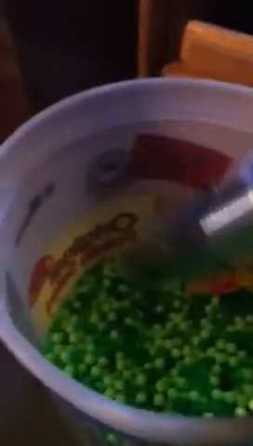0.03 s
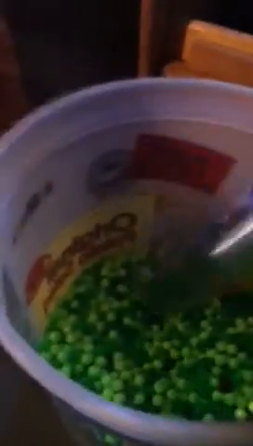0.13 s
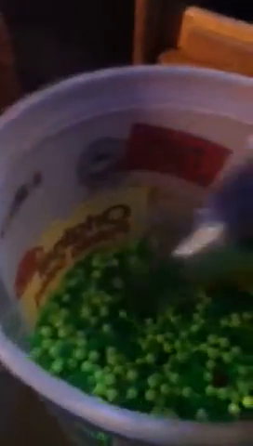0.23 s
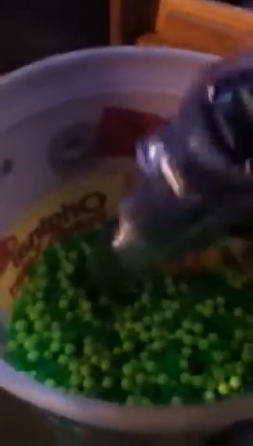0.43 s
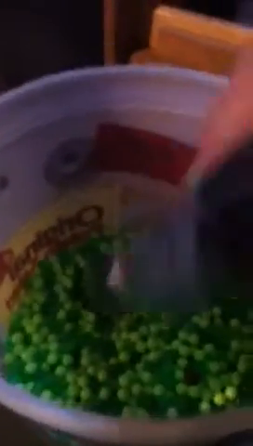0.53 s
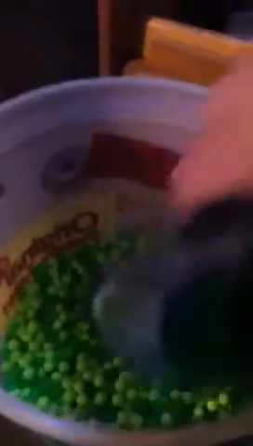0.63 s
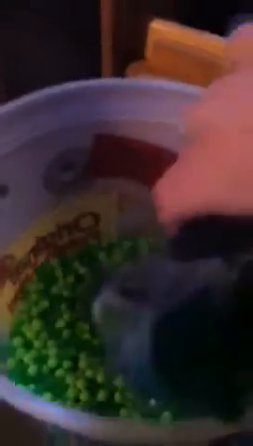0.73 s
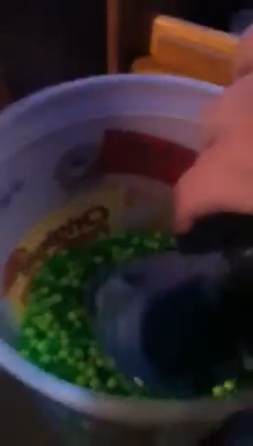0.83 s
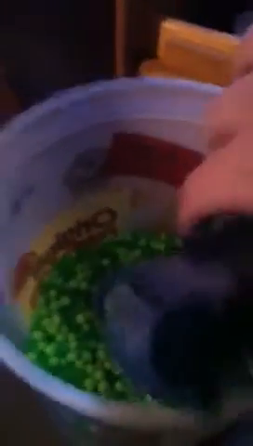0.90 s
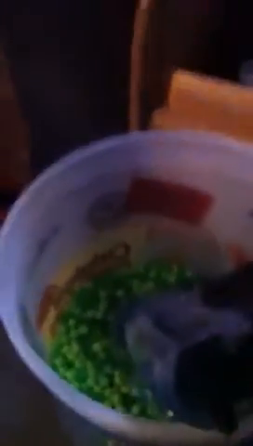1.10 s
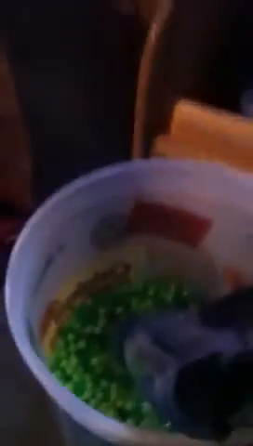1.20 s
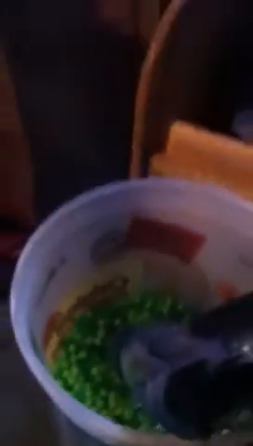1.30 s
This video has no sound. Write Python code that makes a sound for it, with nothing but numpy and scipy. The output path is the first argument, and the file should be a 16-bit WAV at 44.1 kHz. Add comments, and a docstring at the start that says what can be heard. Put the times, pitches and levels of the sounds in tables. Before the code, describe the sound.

Plastic pellets stirred three times in a thin tub, ending with a thump and scrape.

```python
"""Small plastic pellets in a thin plastic tub, stirred by an object pushed through them three times.
Each push sets off a dense rush of tiny collisions that thins out into single ticks.
The object knocks as it digs in, and on the last push it thumps the tub and scrapes along.
One microphone, close to the tub, in a small quiet room."""
import sys
import numpy as np
from scipy import signal
from scipy.fft import rfft, irfft, next_fast_len
from scipy.io import wavfile
from scipy.ndimage import uniform_filter1d

SR = 44100
rng = np.random.default_rng(int(sys.argv[2]) if len(sys.argv) > 2 else 0)


def inscribe(sig):
    """Save sig as 16-bit PCM at rate SR to the path in sys.argv[1].

    A 1-D sig is mono; a 2-D sig holds one channel per row.
    Samples are clipped to [-1, 1] before scaling.
    """
    pcm = np.round(np.clip(np.atleast_2d(sig).T, -1, 1) * 32767)
    wavfile.write(sys.argv[1], SR, pcm.astype(np.int16))


N = 59535
TIME = np.arange(N) / SR
FULL_EFFORT_DB, GENTLE_EFFORT_DB = -19, -29.5
SLIPS_PER_S, SLIP_SPREAD_DB = 5000, 1.46   # pellets slipping on the tub: rate at full effort, size spread


def from_db(db):
    """Decibels to gain."""
    return 10 ** (np.asarray(db) / 20)


def rms_one(x):
    """Scale to rms 1."""
    return x / np.sqrt(np.mean(x ** 2) + 1e-20)


def level(rows):
    """A level curve in dB, silent outside its span."""
    s, db = np.transpose(rows)
    return np.interp(TIME, s, db, left=-100, right=-100)


def roll_off(x, hz, kind="lowpass", order=1):
    """A gentle low-pass or high-pass filter."""
    return signal.sosfilt(signal.butter(order, hz, kind, fs=SR, output="sos"), x)


def colour(x, points):
    """Causal filter with the given spectrum and unit power gain."""
    size = 2 * next_fast_len(N)
    hz, db = np.transpose(points)
    bin_hz = np.arange(size // 2 + 1) * SR / size
    gain = rms_one(from_db(np.interp(np.log(bin_hz + 1), np.log(hz), db)))
    cepstrum = irfft(np.log(gain))
    cepstrum[1:size // 2] *= 2   # folded for minimum phase: nothing sounds ahead of a hit
    cepstrum[size // 2 + 1:] = 0
    return irfft(rfft(x, size) * np.exp(rfft(cepstrum)))[:N]


def resonate(x, hz, width_hz):
    """A resonance with gain 1 at its peak."""
    r, w = np.exp(-np.pi * width_hz / SR), 2 * np.pi * hz / SR
    feed = np.array([1, 0, -1]) * (1 - r * r) / 2
    return signal.lfilter(feed, [1, -2 * r * np.cos(w), r * r], x + 1e-18)


def ring(x, hz, t60):
    """A unit click sets a sine of height 1 ringing."""
    r, w = np.exp(-np.log(1000) / (t60 * SR)), 2 * np.pi * hz / SR
    return signal.lfilter([0, np.sin(w)], [1, -2 * r * np.cos(w), r * r], x + 1e-18)


def modes(blows, table):
    """Blows set every mode of a table ringing."""
    return sum(from_db(db) * ring(blows, hz, t60) for hz, db, t60 in table)


def clicks(s, db):
    """One click per event."""
    out = np.zeros(N)
    out[(np.asarray(s) * SR).astype(int)] = from_db(db)
    return out


def echoes(x, t60, delay_s):
    """Dense reflections that die away, with unit power gain."""
    tail = rng.standard_normal(N) * np.exp(-np.log(1000) * TIME / t60) * (TIME > delay_s)
    return signal.fftconvolve(x, tail / np.linalg.norm(tail))[:N]


def room_tone():
    """The low steady background of the room."""
    # Each row: frequency in Hz, relative level in dB.
    spectrum = [(15, -42), (25, -23), (105, -4), (270, -7), (309, -12.5), (427, -16.5), (516, -15),
                (1130, -21), (2050, -24.5), (3920, -32.5), (6920, -31.5), (16000, -39)]
    return from_db(-54.5) * rms_one(colour(rng.standard_normal(N), spectrum))


def tub(x):
    """The tub adds its hollow resonances and quick reflections from its wall."""
    # Each row: frequency in Hz, width in Hz, relative gain in dB.
    resonances = [(491, 58, 3.5), (635, 50, -10), (1427, 94, -0.5), (1770, 60, -28), (2460, 180, -7.5)]
    hollow = x + sum(from_db(db) * resonate(x, hz, width_hz) for hz, width_hz, db in resonances)
    reflections = echoes(roll_off(hollow, 800, "highpass"), t60=.02, delay_s=.0004)
    return (hollow + from_db(-14) * reflections) * from_db(-1.5)


def scatter(hits, places=6):
    """From each place in the heap, contacts reach the microphone by their own quick reflections."""
    place = rng.integers(0, places, N)
    paths = sum(echoes(hits * (place == k), t60=.0078, delay_s=0) for k in range(places))
    return hits + from_db(-5.5) * paths


def contacts(effort_db, per_s, spread_db, ring_cycles=6.26, variety_db=3.15):
    """Random contacts, more and stronger with effort; each rings briefly with a colour of its own."""
    rate = per_s * from_db(.75 * (effort_db - FULL_EFFORT_DB))
    chance = np.minimum(rate / SR, 1)
    struck = rng.random(N) < chance
    sizes = from_db(spread_db * np.minimum(rng.exponential(1, N), 3))
    signs = rng.choice([-1, 1], N)
    hits = scatter(struck * signs * sizes * from_db(effort_db) / np.sqrt(chance))
    out = 0
    for k, hz in enumerate(np.geomspace(120, 15000, 16)):
        flicker = rms_one(uniform_filter1d(rng.standard_normal(N), size=40))
        width_hz = np.log(1000) / np.pi * hz / ring_cycles
        out = out + (-1) ** k * resonate(hits * from_db(variety_db * flicker), hz, width_hz)
    return rms_one(out) * np.sqrt(np.mean(from_db(effort_db) ** 2))


def snap(s, db, jostle_t60=.0044):
    """One contact briefly jostles the pellets next to it, differently each time."""
    age = TIME - s
    jostle = rng.standard_normal(N) * (age > 0) * np.exp(-np.log(1000) * np.abs(age) / jostle_t60)
    return clicks([s], db) + from_db(db - 2) * jostle / np.linalg.norm(jostle)


def rumble():
    """The shifting heap drums softly on the tub."""
    # Each row: time in seconds, level in dB.
    swell = [(0.265, -44), (0.28, -35), (0.33, -38), (0.4, -33.5), (0.46, -42.5), (0.5, -56), (0.57, -49),
             (0.59, -41), (0.635, -31.5), (0.68, -47), (0.71, -43.5), (0.79, -59.5), (0.84, -47.5),
             (0.9, -40), (0.95, -51.5), (1.01, -52), (1.06, -60)]
    # Each row: frequency in Hz, relative level in dB.
    spectrum = [(60, -45), (140, -11), (260, -6.5), (400, -6.5), (520, -4.5), (750, -6.5), (1500, -10.5),
                (6000, -52)]
    drumming = contacts(np.full(N, FULL_EFFORT_DB), SLIPS_PER_S, SLIP_SPREAD_DB)
    return from_db(level(swell)) * rms_one(colour(drumming, spectrum))


def scrape(rasp_at_s=.922, rasp_width_s=.0067):
    """The object grinds pellets along the tub in quick uneven slips, rasping where it bears down."""
    # Each row: time in seconds, effort in dB.
    effort = [(0.855, -54), (0.865, -25), (0.875, -28), (0.889, -20), (0.92, -26), (0.935, -32.5),
              (0.946, -39.5), (0.96, -50), (0.972, -34), (0.99, -49.5), (1.05, -61.5)]
    # Each row: frequency in Hz, relative level in dB.
    spectrum = [(100, -30), (450, -11.5), (1000, -14.5), (1900, 3.5), (3000, 4.5), (4200, 3), (5500, -4),
                (8000, -7.5), (16000, -31)]
    slips = colour(contacts(level(effort), SLIPS_PER_S, SLIP_SPREAD_DB), spectrum)
    bearing = np.exp(-.5 * ((TIME - rasp_at_s) / rasp_width_s) ** 2)
    return slips + from_db(-1) * resonate(slips * bearing, hz=3600, width_hz=1500)


def knocks():
    """The object hits the tub with a clack, rings its wall and sets the base thumping."""
    # Each row: start in seconds, relative level in dB, offsets in dB for base thump and wall ring.
    strikes = [(0.2048, -13.5, -46, 8), (0.208, -2.5, -28, -3.5), (0.213, -8, -34, -5),
               (0.218, -9, -41, 6.5), (0.8045, -15, -25, -12), (0.816, -22, -13, -14),
               (0.8774, -1, -1, -31), (0.9625, -22, -18, 6), (0.966, -14.5, -5.5, -6),
               (0.972, -37, -20, -12), (0.9812, -18, -29, -15), (1.007, -27, -12, -3),
               (1.029, -34.5, -27, 13.5), (1.038, -39.5, -8, 10), (1.194, -29.5, -21, 2)]
    # Each row: frequency in Hz, relative level in dB.
    clack_spectrum = [(100, -33.5), (600, 2.5), (1000, -0.5), (1700, 5.5), (2800, 9), (4500, -6),
                      (8000, -7), (16000, -17)]
    # The base and the air above it. Each row: frequency in Hz, gain in dB, 60 dB decay in seconds.
    base_modes = [(182, -29, 0.045), (313, -20.5, 0.019), (394.5, -10.5, 0.039), (475, -26, 0.17),
                  (638, -16.5, 0.021)]
    # The thin wall. Each row: frequency in Hz, gain in dB, 60 dB decay in seconds.
    wall_modes = [(625, -44.5, 0.13), (701, -30, 0.079), (1410, -30, 0.029), (1960, -22, 0.024),
                  (2413, -28, .04)]
    s, db, thump_db, wall_db = np.transpose(strikes)
    blows = sum(snap(at, level_db + 5) for at, level_db in zip(s, db))
    clack = roll_off(colour(blows, clack_spectrum), 5500)   # a blunter contact than a pellet's
    thump = modes(clicks(s, db + thump_db - 4), base_modes)
    wall = modes(clicks(s, db + wall_db), wall_modes)
    return clack + roll_off(thump + wall, 190, "highpass", order=2)


def ticks(bounce_s=.002, bounce_db=-9.5):
    """Single pellets snap past each other or drop back: a crack, a short ring and one bounce."""
    # Each row: start in seconds, relative level in dB, ring frequency in Hz.
    snaps = [(0.0508, -37, 4800), (0.0842, -41, 5500), (0.2078, -17, 9600), (0.2832, -10, 5330),
             (0.291, -7, 6500), (0.355, -33, 5850), (0.456, -12, 9000), (0.4603, -29, 7050),
             (0.4764, -15, 8000), (0.4868, -21, 6600), (0.4935, -38, 7400), (0.505, -21, 8750),
             (0.5172, -20.5, 5140), (0.5432, -22, 7440), (0.547, -22, 6100), (0.5885, -13, 7450),
             (0.641, -11, 4600), (0.648, -15, 4960), (0.699, -34, 7100), (0.7228, -24, 8900),
             (0.7393, -18, 8000), (0.7792, -21.5, 8000), (0.794, -31, 10000), (1.013, -25, 12600),
             (1.0894, -43, 6070), (1.1135, -34, 3260), (1.13, -41, 3170), (1.195, -33, 6940),
             (1.2325, -43, 3730), (1.2615, -44, 4500)]
    # Each row: frequency in Hz, relative level in dB.
    spectrum = [(200, -6.5), (1000, 0.5), (3000, 2.5), (6500, -3), (10000, 0), (16000, -18.5)]
    out = 0
    for s, db, hz in snaps:
        cracks = snap(s, db) + snap(s + bounce_s, db + bounce_db)
        out = out + from_db(-2) * cracks + from_db(10) * resonate(cracks, hz, width_hz=3300)
    return colour(out, spectrum)


def pellets():
    """Colliding pellets make a rush with each push, duller when they move gently."""
    # The three pushes. Each row: time in seconds, effort in dB.
    dig = [(0.201, -56), (0.206, -22), (0.216, -23.5), (0.226, -30.5), (0.236, -35.5), (0.244, -24.5),
           (0.27, -34.5), (0.277, -24), (0.355, -21), (0.42, -23), (0.465, -28.5), (0.5, -40),
           (0.57, -42.5)]
    sweep = [(0.568, -46.5), (0.586, -28), (0.626, -16.5), (0.657, -26), (0.688, -24), (0.705, -18),
             (0.725, -29), (0.78, -32.5), (0.794, -49)]
    press = [(0.797, -49), (0.839, -28.5), (0.86, -34.5), (0.889, -24.5), (0.919, -37), (0.95, -48),
             (0.973, -41.5), (1.01, -62), (1.06, -64), (1.35, -87)]
    # Each row: frequency in Hz, relative level in dB.
    spectrum = [(60, -48), (200, -35.5), (400, -11), (620, -6.5), (1000, -3.5), (1400, -1), (1900, 1.5),
                (2900, -2.5), (5500, 0), (9000, -5.5), (12500, -16.5), (16000, -35)]
    out = 0
    for push in (dig, sweep, press):
        effort_db = level(push)
        rush = colour(contacts(effort_db, per_s=11000, spread_db=2.5), spectrum)
        soft = roll_off(rush, 8000)
        treble_gain = from_db(.6 * (effort_db - GENTLE_EFFORT_DB))
        out = out + soft + (rush - soft) * treble_gain
    return out


def scene():
    """The tub close up, in mono, with the small room's faint reverberation and tone behind it."""
    near = tub(pellets() + rumble() + ticks() + knocks() + scrape())
    background = room_tone()
    reverb = from_db(-19.5) * echoes(near, t60=.19, delay_s=.012)
    return (near + reverb + background)[None]


def record(dry, ceiling=.74, cutoff_hz=16000):
    """Soft overload rounds the peaks, then a steep filter cuts the top treble."""
    rounded = ceiling * np.tanh(dry / ceiling)
    return signal.sosfilt(signal.ellip(10, .1, 80, cutoff_hz, fs=SR, output="sos"), rounded)


dry = scene()
out = record(dry)
inscribe(out)
```